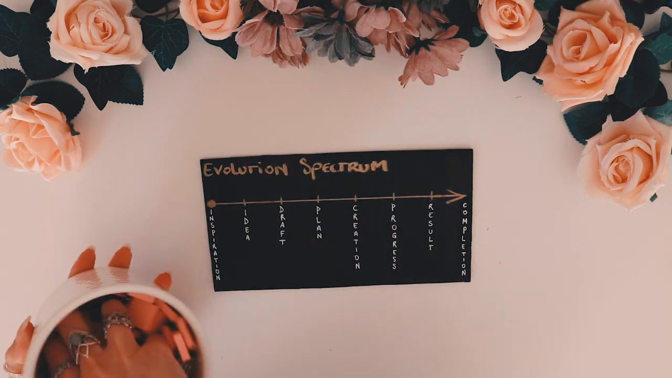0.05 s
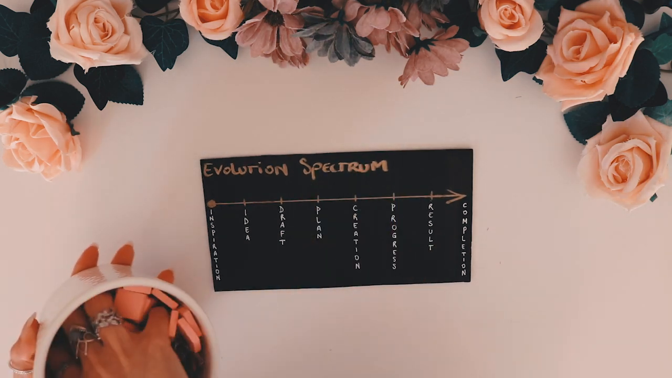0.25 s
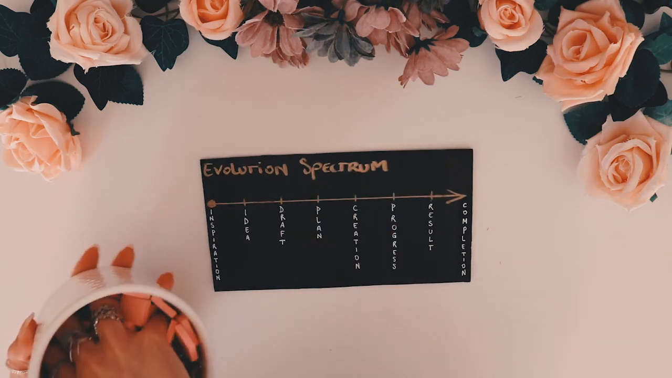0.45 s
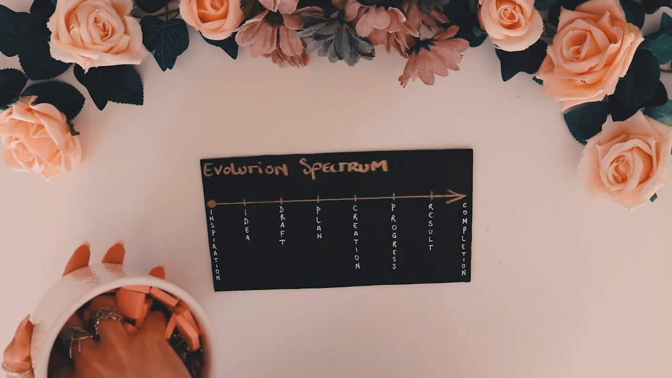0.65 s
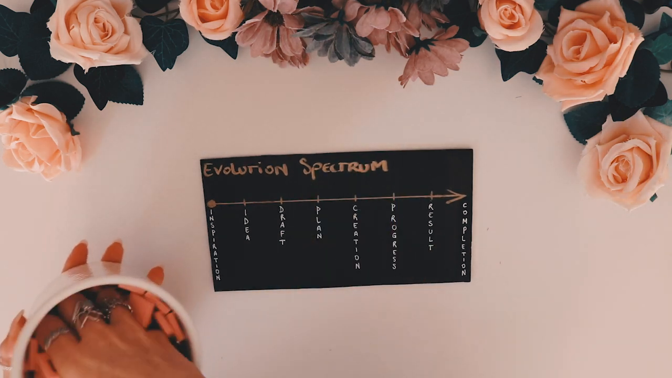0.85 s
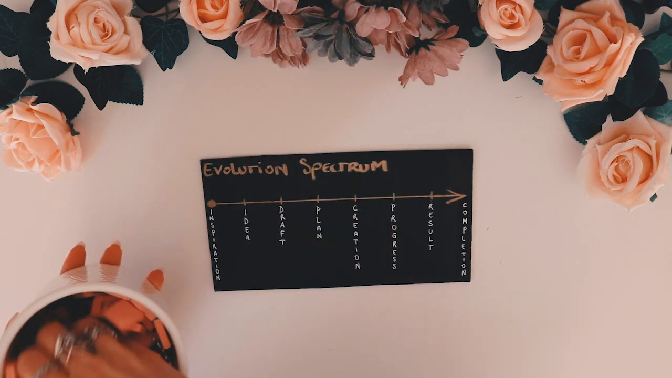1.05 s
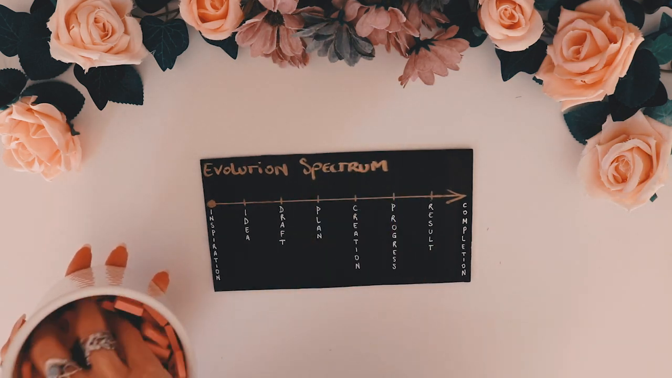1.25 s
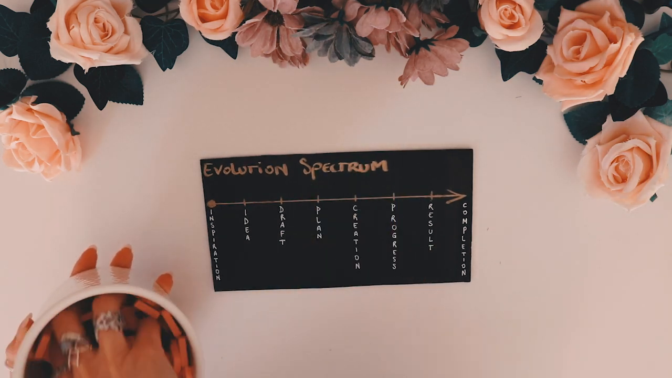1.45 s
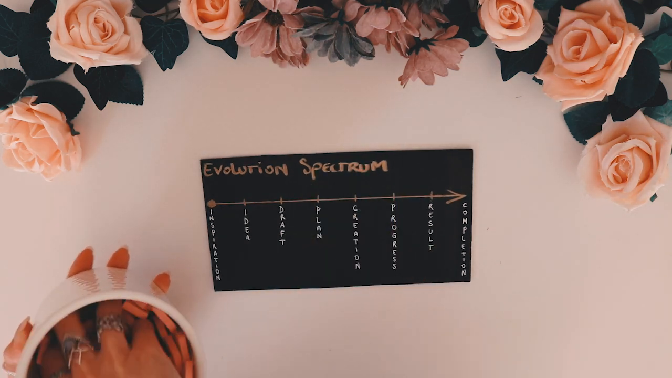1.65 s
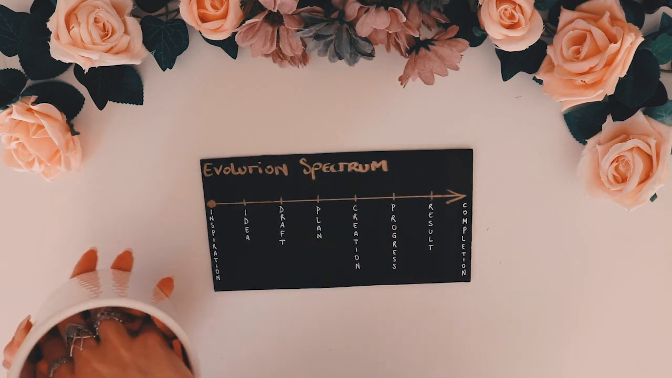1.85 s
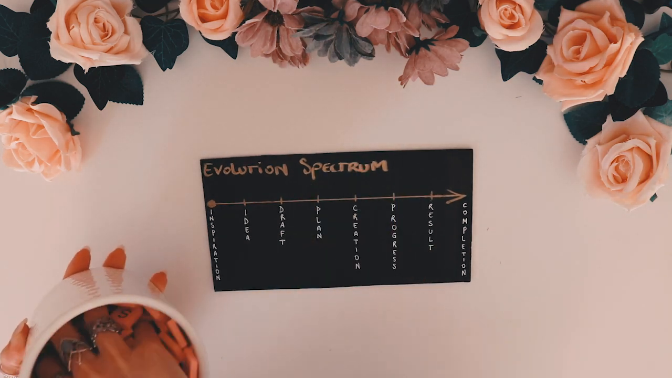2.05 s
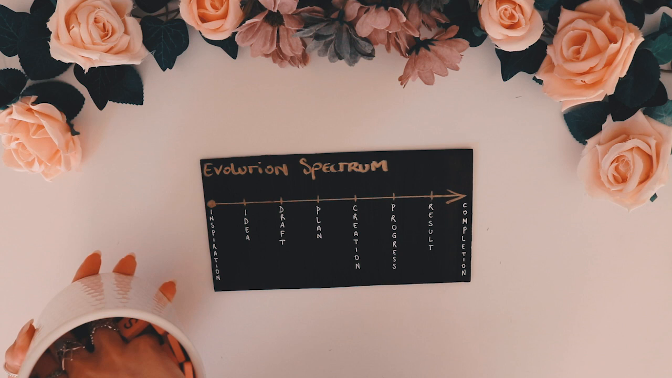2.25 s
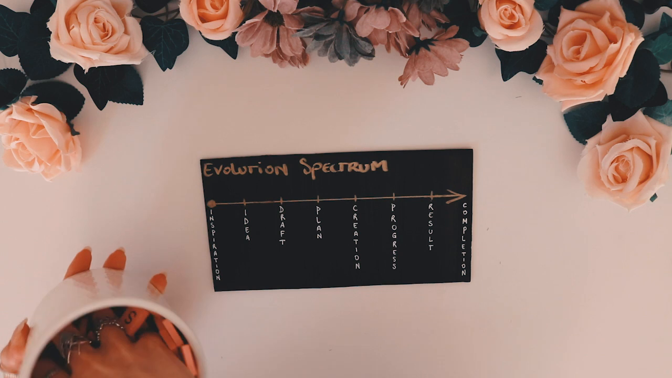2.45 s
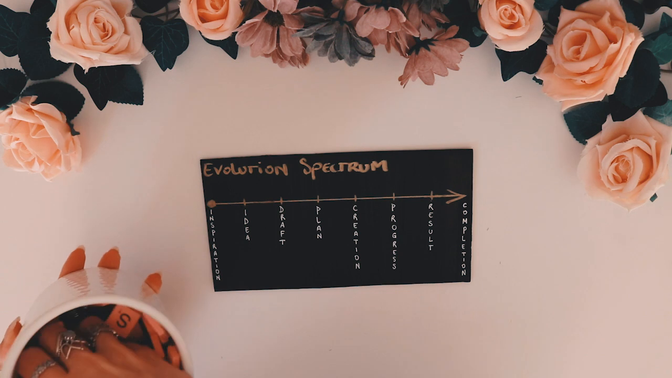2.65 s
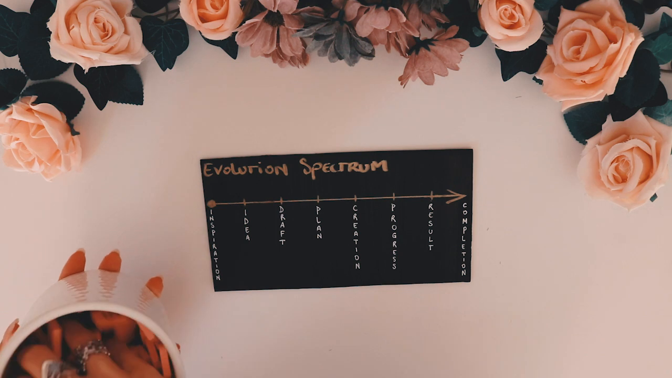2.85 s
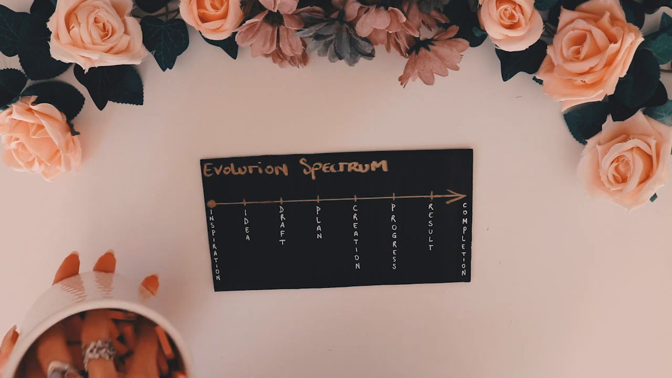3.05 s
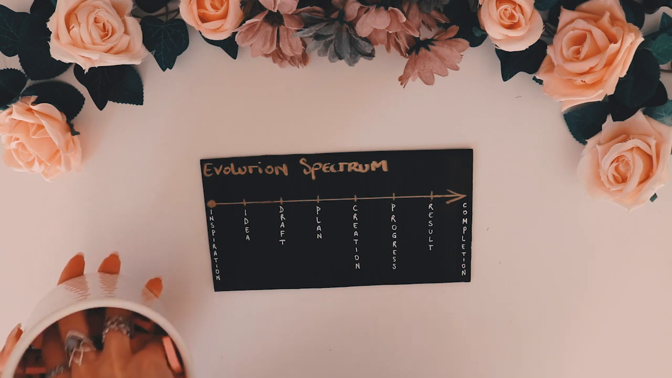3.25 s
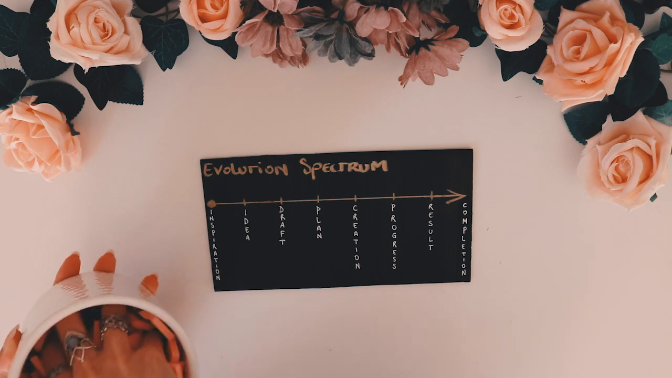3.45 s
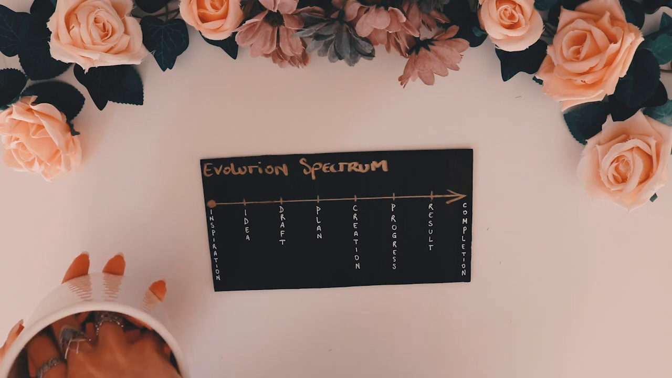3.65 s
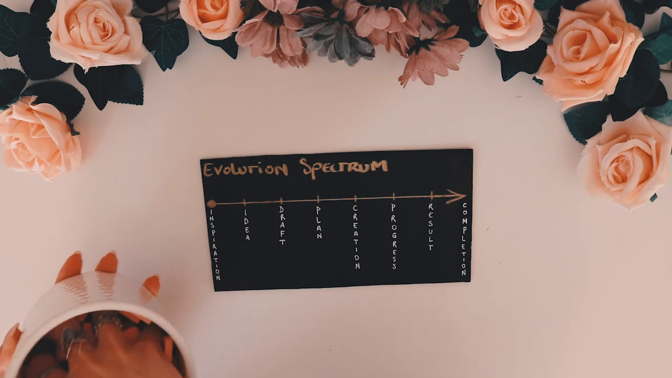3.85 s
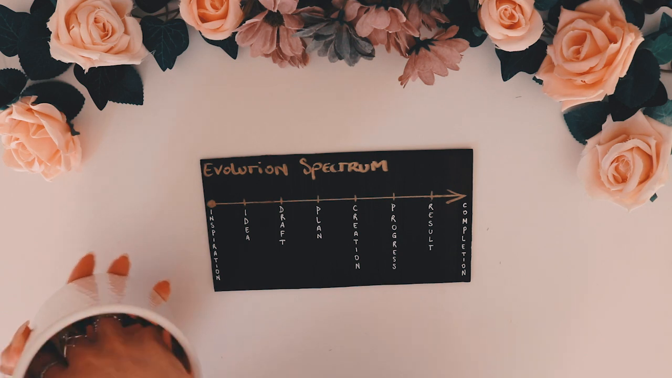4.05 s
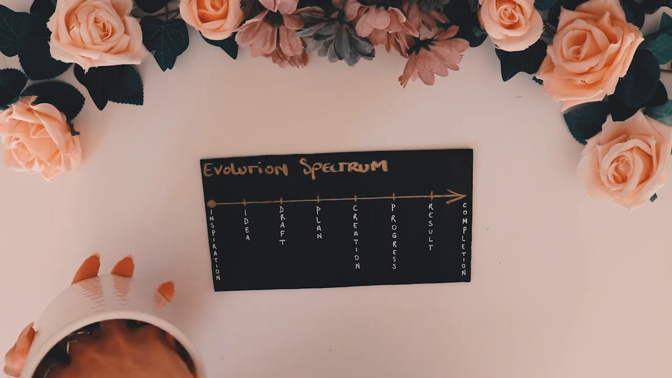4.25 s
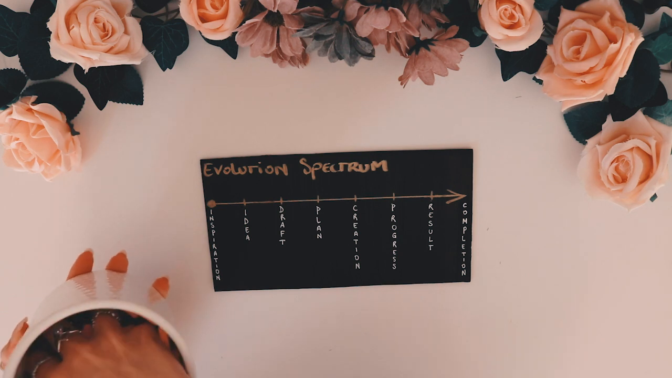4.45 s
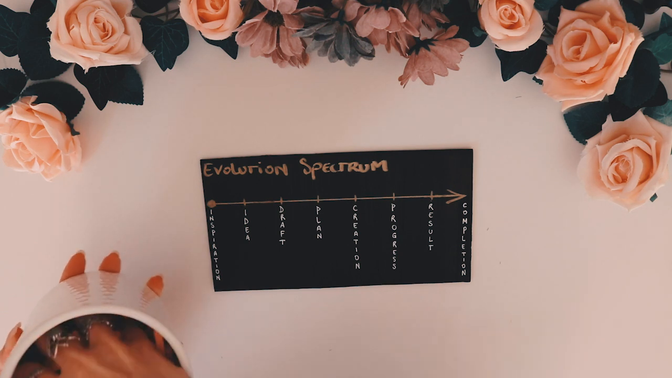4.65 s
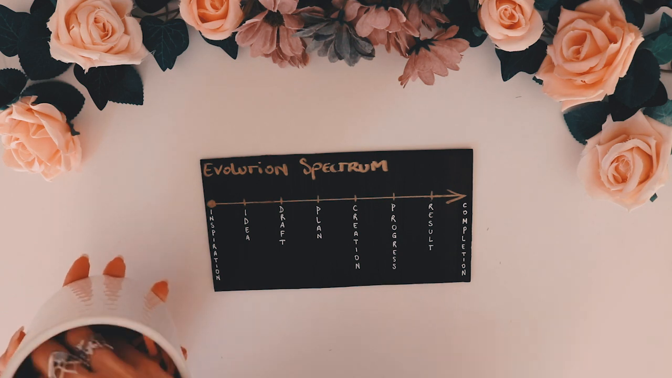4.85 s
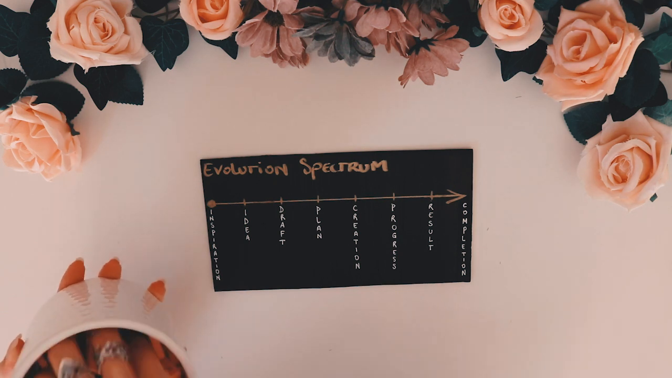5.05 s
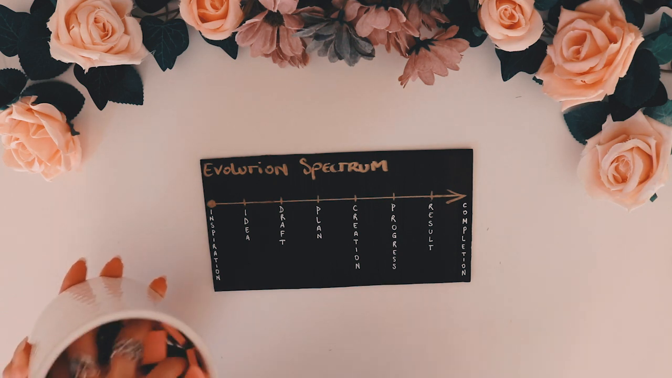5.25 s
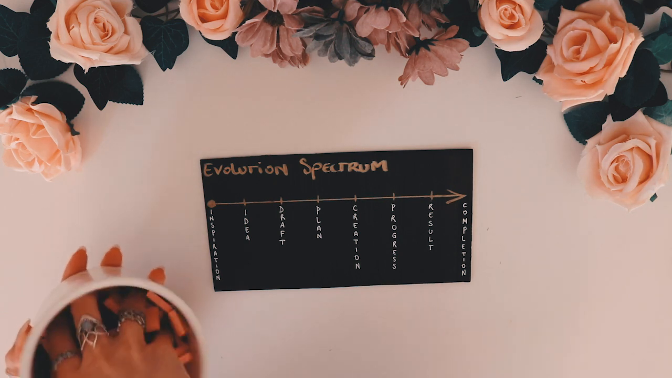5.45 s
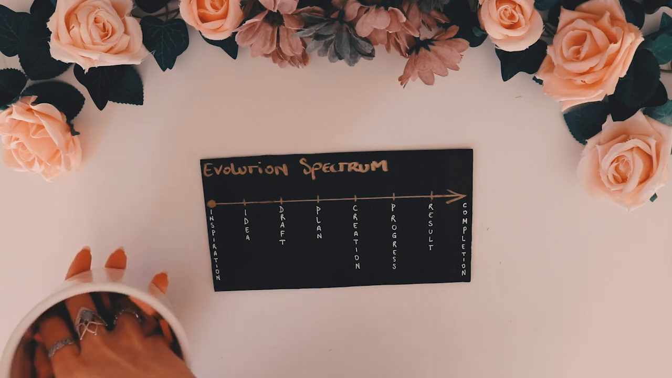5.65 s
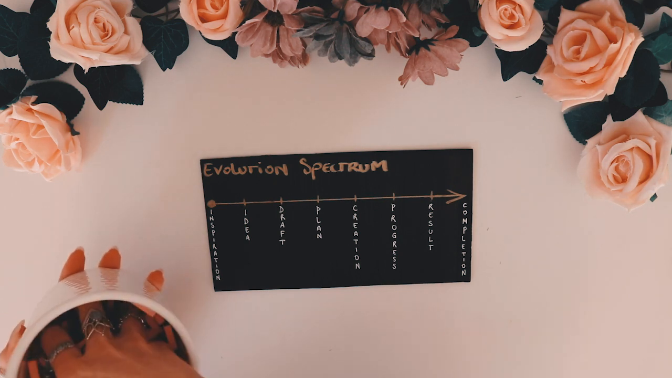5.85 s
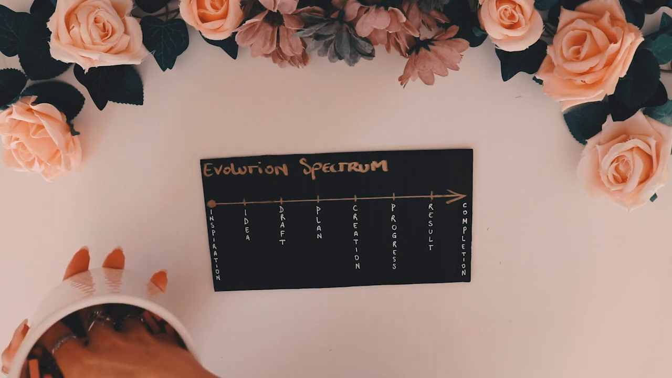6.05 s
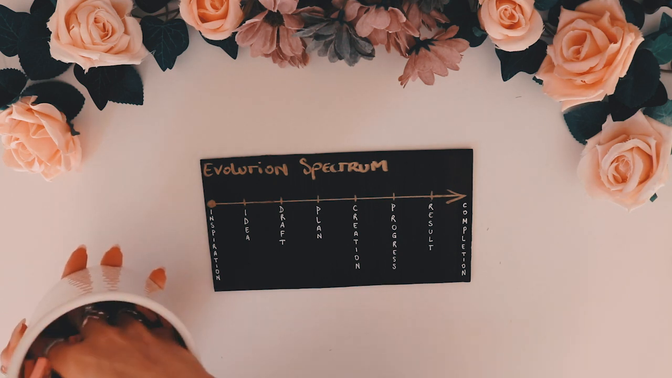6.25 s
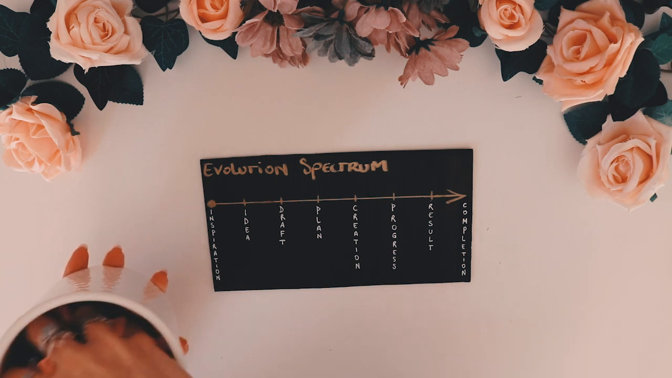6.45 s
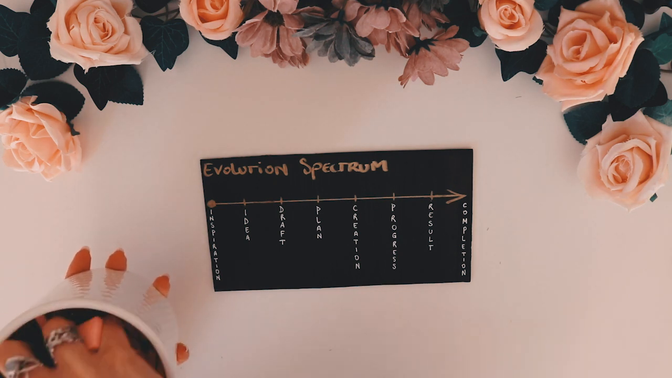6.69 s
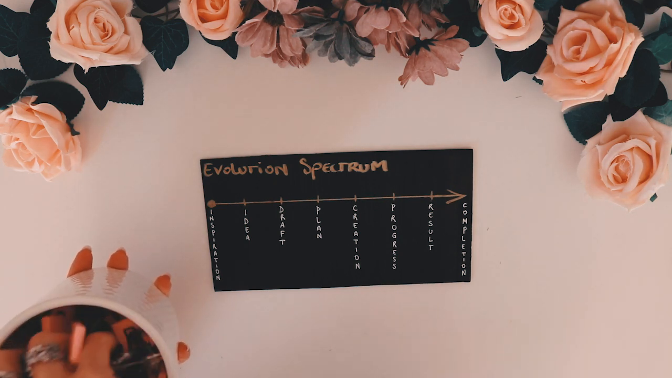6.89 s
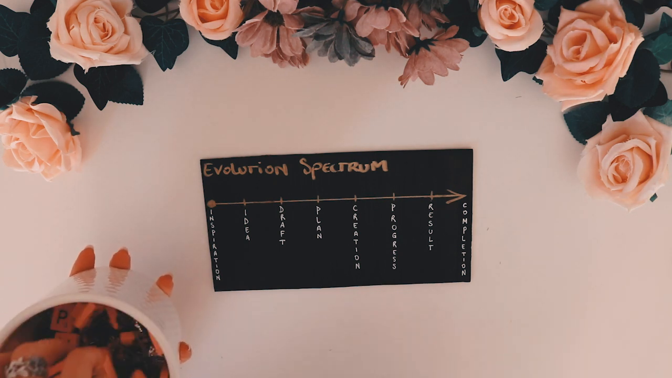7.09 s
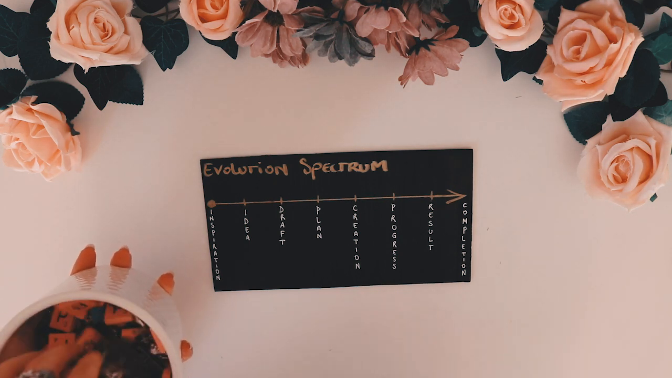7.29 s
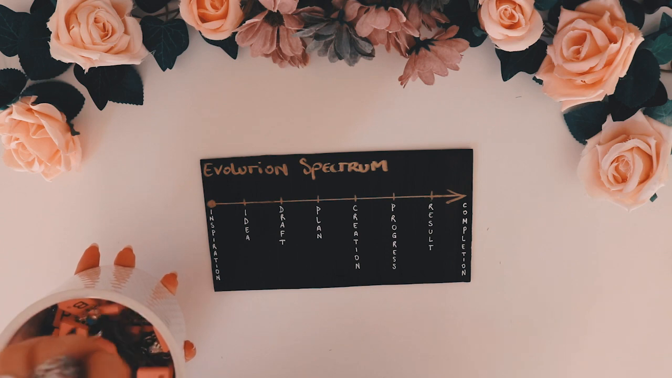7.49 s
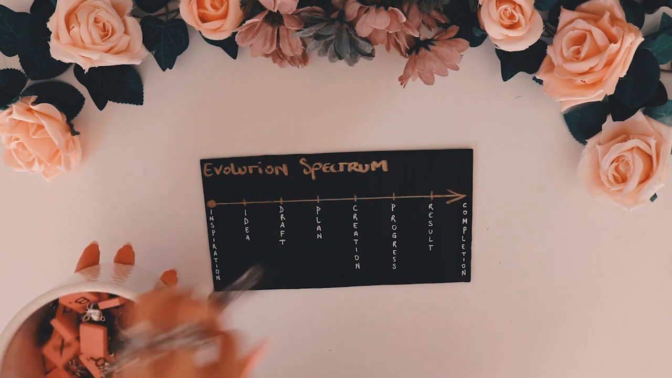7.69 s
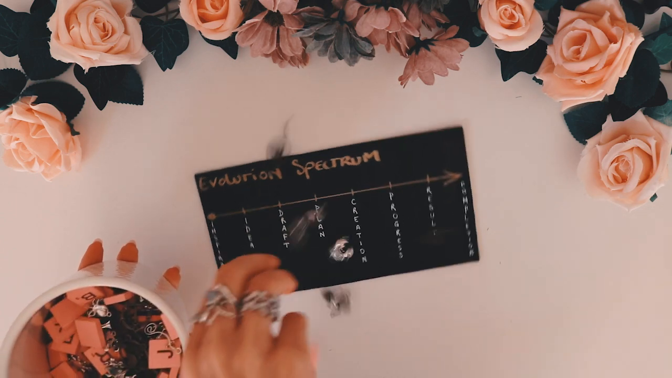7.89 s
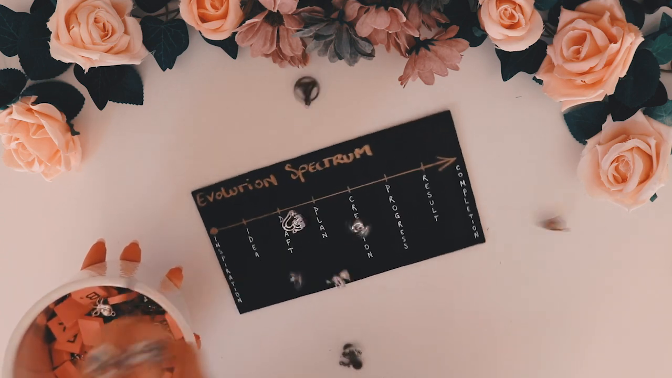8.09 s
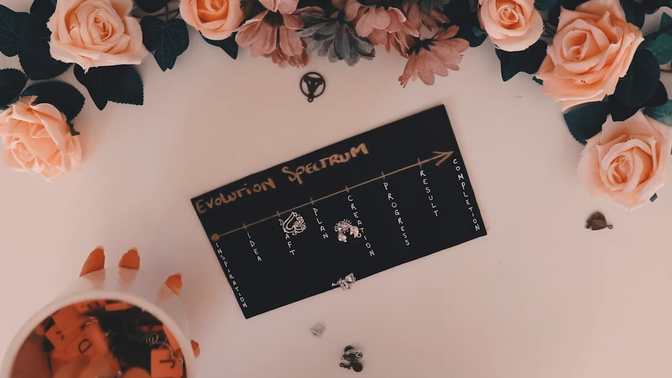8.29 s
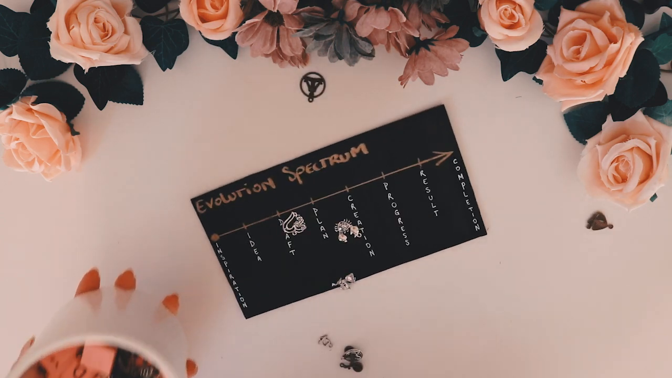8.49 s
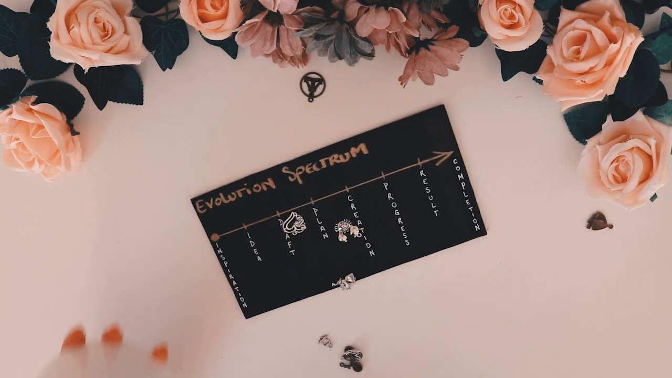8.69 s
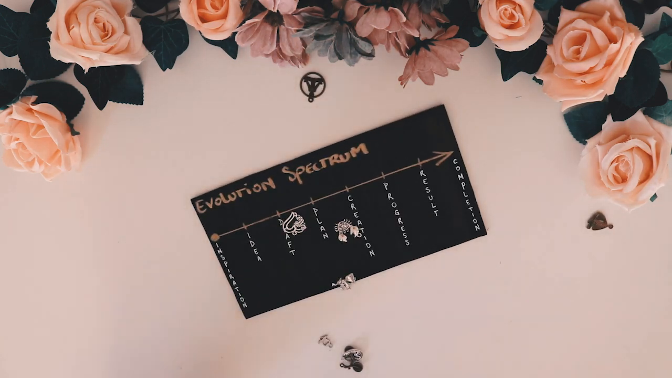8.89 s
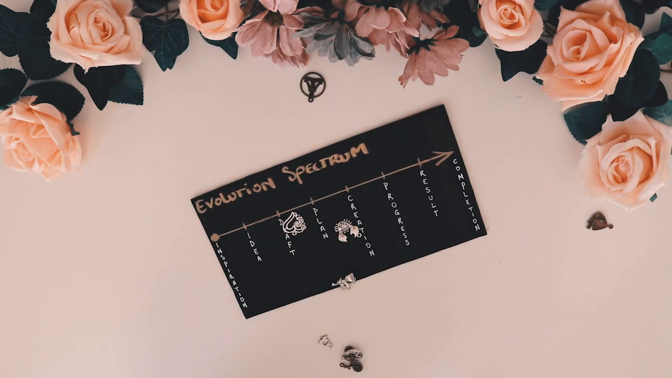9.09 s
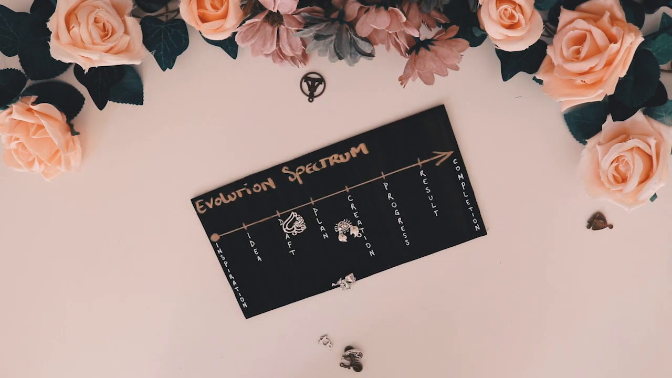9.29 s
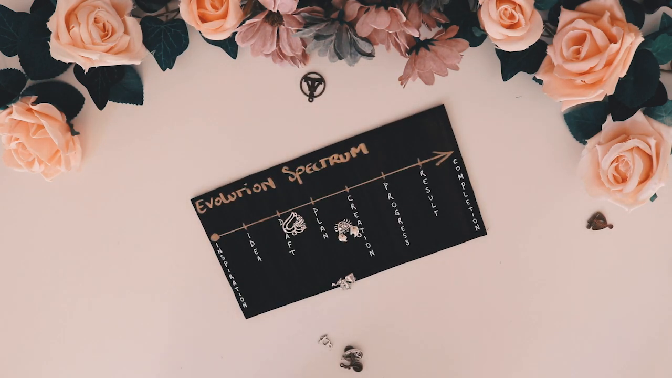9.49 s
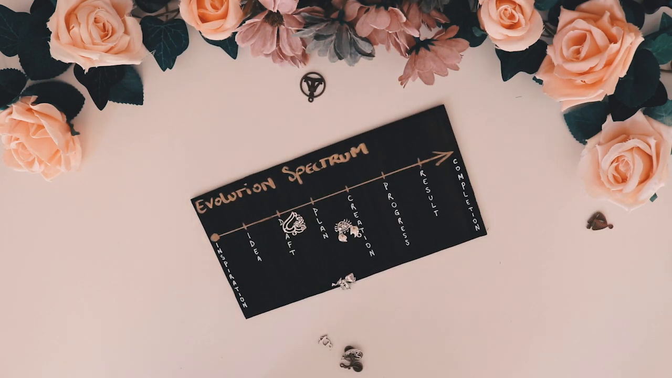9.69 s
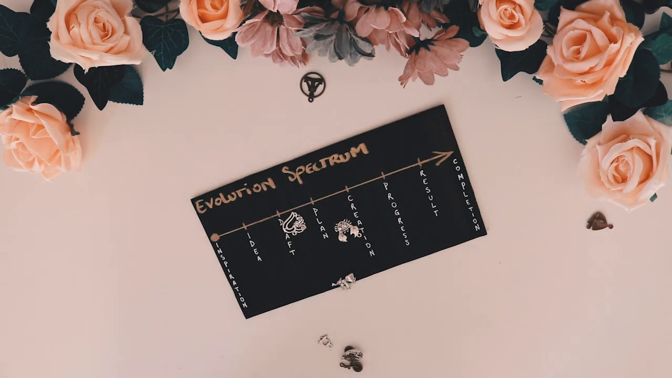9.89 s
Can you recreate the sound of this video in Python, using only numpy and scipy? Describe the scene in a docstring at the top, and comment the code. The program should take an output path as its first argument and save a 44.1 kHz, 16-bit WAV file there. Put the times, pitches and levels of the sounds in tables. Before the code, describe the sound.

A hand rummages through a ceramic cup of small metal charms and tiles, making a crisp, high, jingling rustle over a faint hollow cup tone. Some sharper knocks ring the wall. Then a brief dull-and-bright clatter as pieces land on card and tabletop and slide to a stop. A quiet pause, then several hard cup clinks. Close microphones, dry small room, very faint rumble.

```python
"""Small metal charms and tiles rustle and jingle in a ceramic cup, stirred by hand close to the microphone.
The crowd is filtered noise with tiny rings; the cup adds body resonances and a hollow that the hand tunes.
Snaps and knocks are noise cracks with ringing wall modes. A handful is cast on a card on the table,
clacking through plate modes and skittering to rest; then the cup clinks and its contents shift again.
Behind it lie a small room's reply, still air and a faint low rumble, in two microphone ports."""
import sys
import numpy as np
from scipy import signal
from scipy.fft import rfft, irfft, next_fast_len
from scipy.io import wavfile
from scipy.ndimage import uniform_filter1d, map_coordinates

SR = 44100
rng = np.random.default_rng(int(sys.argv[2]) if len(sys.argv) > 2 else 0)


def dump_mix(stems):
    """Bounce the given channels to the path in sys.argv[1] as a 16-bit WAV at rate SR."""
    frames = np.atleast_2d(stems).T  # one column per channel
    limited = np.clip(frames, -1, 1)  # hard clip at full scale
    pcm = np.round(limited * 32767).astype(np.int16)
    wavfile.write(sys.argv[1], SR, pcm)


N = 437913

TOP_HZ = 15900  # upper band limit
IDLE_S = 7.58  # until then the hand lies in the cup
HANDLING_S = 9.238  # the cup, set aside before, is moved again

# spectrum of a hard click, in the cup or on the table: (freq_hz, density_db per Hz)
CLICK_SPECTRUM = [(300, -40), (1200, -23.5), (3000, 0.5), (5000, 6.5), (9000, 5), (15500, -5.5)]


def stirring():
    """Charms tumble against each other and sound the cup's body and hollow."""
    # strokes of the fingers, then shifts of the charms in the moved cup after 9 s:
    # (start_s, length_s, relative level_db)
    strokes = [(-.03, .13, -40), (.14, 0.13, -42), (.28, 0.09, -40), (.467, .11, -38.5), (.62, 0.12, -41),
               (.76, 0.18, -46), (.905, 0.018, -46.5), (.97, 0.048, -42), (1.045, 0.11, -39.5),
               (1.15, 0.1, -39.5), (1.28, 0.15, -45.5), (1.4, 0.13, -43), (1.55, 0.026, -49.5),
               (1.645, 0.15, -41.5), (1.875, 0.063, -40), (2.06, 0.14, -43), (2.21, 0.081, -40.5),
               (2.37, 0.12, -46.5), (2.53, 0.1, -41.5), (2.65, 0.073, -45), (2.765, 0.11, -42),
               (2.91, 0.14, -43.5), (3.05, 0.021, -43), (3.2, 0.082, -38.5), (3.35, 0.069, -42),
               (3.51, 0.033, -40.5), (3.635, 0.028, -39.5), (3.745, 0.034, -42), (3.905, 0.047, -40.5),
               (4.035, 0.028, -45), (4.095, 0.049, -45), (4.22, 0.015, -46.5), (4.295, .012, -63),
               (4.35, 0.041, -41.5), (4.43, 0.14, -47.5), (4.54, 0.12, -44.5), (4.69, 0.25, -43),
               (4.97, 0.093, -41), (5.07, 0.16, -42.5), (5.31, 0.034, -43), (5.471, 0.11, -40),
               (5.65, 0.02, -41), (5.705, 0.076, -37.5), (5.86, 0.07, -46.5), (5.94, 0.067, -43),
               (6.01, 0.099, -41), (6.17, 0.18, -45.5), (6.35, 0.12, -48), (6.47, 0.1, -46.5),
               (6.55, 0.056, -46), (6.62, 0.1, -43), (6.74, 0.14, -40.5), (6.835, 0.083, -35),
               (6.93, 0.11, -39.5), (7.08, 0.04, -41.5), (7.108, 0.022, -41.5), (7.18, 0.063, -42),
               (7.315, 0.02, -43.5), (7.475, 0.069, -45), (7.38, 0.16, -43), (7.63, 0.02, -49),
               (7.71, 0.017, -57), (9.052, 0.025, -73), (9.16, 0.029, -98), (9.587, 0.032, -35),
               (9.69, 0.066, -38)]
    # broad resonances of the filled cup: (freq_hz, width_hz, relative level_db)
    body_modes = [(411, 34, -18.5), (1481, 24, 2), (1920, 82, -6), (2058, 110, -7.5), (2680, 140, -4),
                  (2960, 90, -7), (3407, 87, -4), (3680, 91, 1), (4445, 220, -3.5), (6730, 100, 3.5),
                  (7240, 150, -3.5), (9520, 120, 3.5), (10530, 56, 5), (11600, 49, -7.5), (11950, 70, -1),
                  (13100, 80, 3), (14690, 80, -5)]
    # spectrum of charm on charm: (freq_hz, density_db per Hz)
    rattle_spectrum = [(60, -21.5), (300, -34), (550, -32.5), (1100, -22), (1700, -11.5), (2300, -12),
                       (3100, -5.5), (4000, -3.5), (8000, 0.5), (10500, 3), (15500, -4.5)]
    settle_db_per_s = 190.5  # how fast the charms come to rest

    pushes = swells(strokes, attack_s=0.013, sag_db_per_s=16.5, release_db_per_s=settle_db_per_s)
    idle = amp(-50.5) * until(IDLE_S, settle_db_per_s)  # the resting hand keeps them faintly astir
    effort = np.hypot(pushes, idle)

    crowd = spread(contacts(rate=750, spread_db=3.6, click_t60=0.022, ring_t60=0.04, ring_db=-2.5, order=2))
    rattle = amp(-3) * effort * crowd
    ticks = contacts(rate=260, spread_db=5, click_t60=.003, ring_t60=.005, ring_db=-6)
    ticks = amp(-10) * effort * ticks

    wall_contacts = contacts(rate=700, spread_db=2.0, click_t60=0.035, ring_t60=0.03, ring_db=-10)
    on_wall = effort * spread(wall_contacts)
    body = np.zeros((2, N))
    for hz, width_hz, db in body_modes:
        # each resonance flares and fades as the charms touch other places; the high ones most
        flare_db = 3.36 * (hz / 7000) ** 0.34 * wander(rate=14)
        body += amp(db + flare_db) * signal.lfilter(*signal.iirpeak(hz, hz / width_hz, SR), on_wall)

    # the power below 1 lets gentle strokes still move the air in the cup
    push = amp(-46.0) * (effort / amp(-42.5)) ** 0.8 * crowd
    air = amp(9.5) * hollow(push, width_hz=118)

    jingle = amp(-3.5) * jingles(effort, rate=22, lo_hz=8000, hi_hz=15300, t60=.09)
    tiles = amp(1.5) * jingles(effort, rate=100, lo_hz=2500, hi_hz=7000, t60=.016)
    return coloured(rattle + ticks, rattle_spectrum) + amp(2.5) * body + air + jingle + tiles


def contacts(rate, spread_db, click_t60, ring_t60, ring_db, size=640, order=4):
    """Many tiny collisions a second: decaying noise clicks, some with a brief ring, evened out in level."""
    count = int(rate * N / SR)
    start, pitch, *angles = rng.random((count, 4)).T
    at = (start * N).astype(int)
    strength = amp(spread_db * rng.standard_normal(count))
    hits = np.bincount(at, strength ** 2, N)
    energy = signal.lfilter([1], [1, -fade(2 / SR, click_t60)], hits)
    crowd = np.sqrt(energy) * rng.standard_normal((2, N))

    t = np.arange(size) / SR
    free = np.s_[::order, None]  # only one charm in every `order` lies free enough to ring
    ring = amp(ring_db) * strength[free] * fade(t, ring_t60) * np.linspace(1, 0, size)
    places = (at[free] + np.arange(size)).ravel()
    for port, angle in zip(crowd, angles):
        tones = ring * np.sin(2 * np.pi * (TOP_HZ * pitch[free] * t + angle[free]))
        port += np.bincount(places, tones.ravel(), N + size)[:N]

    power = np.mean(crowd ** 2, axis=0)
    power = uniform_filter1d(uniform_filter1d(power, size=1200), size=1200)
    return crowd / np.sqrt(np.abs(power) + 1e-9)


def hollow(x, width_hz, dip_db=-2.5, open_db=-4):
    """The air in the cup: one resonance that sinks as the hand dips in and rises as it leaves."""
    # the hand dips deep and half closes the cup: (middle_s, half_length_s, pitch_fall_hz)
    dips = [(.98, 0.16, 95), (2.7, 0.19, 25), (4.75, 0.2, 78), (6.5, 0.26, 95)]
    inside_hz, open_hz = 723.5, 779  # with the hand inside and without
    hand_out_s, withdraw_s = 7.43, 0.46  # when and how slowly it leaves
    set_aside_db = -3  # the mouth of the cup then faces away

    t = np.arange(N) / SR
    fall = sum(fall_hz * np.exp(-((t - s) / half) ** 2) for s, half, fall_hz in dips)
    gone = .5 + .5 * np.tanh((t - hand_out_s) / withdraw_s)
    pitch = inside_hz + (open_hz - inside_hz) * gone - fall

    # shift the moving pitch down to zero, low-pass twice, and shift it back
    turn = np.exp(2j * np.pi * np.cumsum(pitch) / SR)
    band = signal.butter(1, width_hz / SR)
    slow = signal.lfilter(*band, signal.lfilter(*band, x.mean(axis=0) / turn))
    air = 2 * np.real(turn * slow)

    db = dip_db * fall / fall.max() + open_db * gone + set_aside_db * (t > HANDLING_S)
    return amp(db) * signal.lfilter(*signal.butter(2, [520, 1000], "band", fs=SR), air)


def jingles(effort, rate, lo_hz, hi_hz, t60):
    """Now and then a loosened charm or tile gives a small ring, stronger in a brisk stroke."""
    out, t = np.zeros((2, N)), np.arange(SR // 4) / SR
    for when, pitch, size, lag in rng.random((int(rate * N / SR), 4)):
        hz = lo_hz + pitch * (hi_hz - lo_hz)
        phase = 2 * np.pi * (hz * t + lag * np.array([[0], [.5]]))
        add(out, when * N / SR, size * effort[int(when * N)] * np.sin(phase) * fade(t, t60))
    return out


def knocks():
    """A charm cracks and clacks on a neighbour or the wall, whose beating modes ring as the grip allows."""
    # strikes on the wall: (start_s, relative level_db, ring_db re level, favoured_hz, lift_db, length_factor)
    wall_knocks = [(3.245, -31, -7, 3680, 7.5, 0.58), (3.345, -38, -7.5, 3692, 9, .8),
                   (4.053, -44.5, -9, 6700, 14, .4), (4.553, -39.5, -7.5, 6900, 8, 0.34),
                   (5.104, -31, -8.5, 6600, 3.5, 0.79), (5.3095, -18, -13, 10450, 4, 0.34),
                   (5.333, -33.5, -8.5, 3670, 9.5, 1), (5.73, -37, -10, 6800, 8.5, .91),
                   (6.85, -28.5, -5, 6680, 11.5, 0.71), (6.857, -27, -4.5, 3690, 1, .7),
                   (6.881, -27, -12, 6780, 7, 0.3), (6.942, -32.5, -4, 6720, 9.5, 1),
                   (6.98, -32, -8, 6700, 6.5, .51), (7.034, -31, -7.5, 3730, 8.5, 0.54),
                   (7.072, -22, -7.5, 1472, 9, 1), (7.074, -28.5, -10, 3692, 12, 0.89),
                   (7.646, -27, -15, 3710, 5, 0.59), (7.721, -23.5, -13, 3800, 5.5, 0.53),
                   (8.24, -31.5, 0.5, 6590, 3.5, .39), (8.421, -31, -4.5, 6640, 4.5, .4),
                   (9.376, -28.5, -5, 3870, 8, 0.27), (9.381, -30.5, -3.5, 3710, 13, 0.35),
                   (9.524, -37, 7, 6400, 9, 0.4), (9.529, -37, 9.5, 1526, 9.5, 0.22),
                   (9.593, -22.5, -13.5, 5850, 6.5, 0.22), (9.595, -16.5, -12, 4590, 13, 0.16),
                   (9.604, -29.5, -11, 3710, 12, 0.49), (9.617, -29, -12, 9400, 2, .35),
                   (9.669, -33.5, -16, 9520, 1, .3), (9.69, -27, -3.5, 6500, 8, 0.63),
                   (9.703, -27, -5, 10600, 4, 0.27), (9.7217, -19.5, -9.5, 4750, 3, 0.29),
                   (9.728, -31.5, -6, 3700, 12.5, 0.71), (9.742, -25, -13.5, 11950, 15, .4),
                   (9.756, -26, -9, 6700, 6, .31), (9.765, -29.5, -4, 6700, 4, 0.17)]
    # charm snapping against charm: (start_s, relative level_db, note_hz)
    charm_snaps = [(0.0922, -35, 6730), (0.1485, -16, 9860), (0.3493, -26.5, 6800), (0.47, -40, 10700),
                   (0.495, -33, 6260), (0.5282, -25, 12500), (0.6624, -32.5, 10450), (0.7018, -30, 10400),
                   (0.8067, -32, 3630), (0.912, -32, 4480), (0.97, -31, 10360), (1.04, -30.5, 5630),
                   (1.126, -25.5, 2770), (1.141, -28, 5440), (1.188, -32, 6720), (1.2785, -28, 6720),
                   (1.4, -26, 6640), (1.4279, -24, 6800), (1.4773, -27, 6730), (1.6504, -33, 10300),
                   (1.8522, -29.5, 6500), (2.3725, -30, 8800), (2.393, -32, 9000), (2.6636, -25, 10450),
                   (2.9083, -24.5, 9050), (3.055, -31.5, 5760), (3.0867, -21, 8700), (3.2244, -27, 6630),
                   (3.542, -33, 6660), (3.5926, -29.5, 9910), (3.6471, -27, 6600), (3.9335, -27.5, 6630),
                   (4.1744, -30.5, 6890), (4.2255, -26, 10000), (4.5854, -30.5, 9700), (4.8267, -33, 7500),
                   (5.4725, -34, 6700), (5.5558, -24.5, 6700), (5.7044, -32.5, 7890), (6.356, -24, 8360),
                   (6.411, -29, 9100), (6.4884, -27, 10500), (6.569, -28.5, 11300), (6.767, -29.5, 6700),
                   (6.8019, -26, 6670), (7.245, -25, 7500), (7.2715, -30.5, 8960), (7.345, -28, 8900),
                   (7.363, -29, 7800), (7.401, -25, 8300), (7.66, -35, 6850), (9.0542, -51.5, 6400),
                   (9.0678, -65, 6390), (9.0937, -64.5, 9200), (9.2446, -42.5, 10300), (9.257, -51, 7000)]
    # modes of the ceramic wall: (freq_hz, relative level_db, t60_s at length factor 1)
    wall_modes = [(1480, -9.5, 0.31), (3702, -3.5, 0.21), (4030, -13.5, .05), (4660, -13.5, 0.05),
                  (5700, -14.5, 0.037), (6702, -0.5, 0.22), (6900, -9, 0.15), (9550, 0.5, 0.21),
                  (10280, 2.5, 0.26), (11100, -12, .15), (12200, -4, 0.22), (13190, -8, .2),
                  (14700, -6.5, 0.22)]
    # what the table carries once the cup is set down: (freq_hz, density_db per Hz)
    table_spectrum = [(100, -25), (350, -24), (600, -0.5), (1100, 2), (1700, -3), (3000, -25), (8000, -50)]
    set_down_s = 9.58

    cracks, rings = np.zeros((2, 2, N))
    t = np.arange(SR // 4) / SR
    hz, level_db, t60 = np.transpose(wall_modes)[..., None]
    # a snap barely stirs the wall: ring -19.5 dB, nearest mode lifted 3 dB, ring length factor 0.59
    snaps = [(s, db, -19.5, note_hz, 3, 0.59) for s, db, note_hz in charm_snaps]
    for s, db, ring_db, favoured_hz, lift_db, length in wall_knocks + snaps:
        crack = rng.standard_normal((2, len(t))) * (fade(t, 0.08) + amp(-36.5) * fade(t, .1))
        add(cracks, s, amp(db - 15.5) * crack)

        # the striking charm's own short note; charms are too small to sound low ones
        small = min(favoured_hz / 4700, 1) ** 2
        clack = np.sin(2 * np.pi * favoured_hz * t) * fade(t, 0.046)
        add(rings, s, small * amp(db - 11) * clack)

        # the place struck favours one mode
        favour_db = lift_db * np.exp(-(np.log(hz / favoured_hz) / 0.049) ** 2)
        # a soft touch misses the high modes
        soft_db = max(ring_db, 0) * (hz / 7000) ** 3
        # a glancing blow hardly moves the lowest mode
        glance_db = min(ring_db + 7, 0) * (1800 / hz) ** 2
        strength = amp(level_db + favour_db - soft_db + glance_db + rng.normal(0, 1.7, hz.shape))

        pitch = hz * (1 + rng.normal(0, .003, hz.shape))
        # touching charms blur the ring at first
        chatter = np.cumsum(rng.normal(0, 0.0079, (len(hz), len(t))) * fade(t, 0.14), axis=1)
        port_phase = rng.normal(0, 1.0, (2, len(hz), 1)) / 2
        phase = 2 * np.pi * (pitch * t + rng.random(hz.shape)) + chatter + port_phase
        # paired modes beat at 20-70 Hz
        beat = 1 + .3 * np.cos(2 * np.pi * rng.uniform(20, 70, hz.shape) * t)
        modes = strength * beat * np.sin(phase) * fade(t, t60 * max(length, .1))
        add(rings, s, amp(db + ring_db - 4.5) * np.sum(modes, axis=1))

    on_table = spread(cracks) * (np.arange(N) / SR > set_down_s)
    set_down = amp(-13) * coloured(on_table, table_spectrum)
    air = amp(4.0) * hollow(cracks, width_hz=240)
    return coloured(spread(cracks), CLICK_SPECTRUM) + rings + set_down + air


def pings():
    """Small rings at single pitches, mostly high: each a decaying sine, slightly out of phase in the ports."""
    # small rings at single pitches: (start_s, pitch_hz, relative level_db, t60_s)
    small_rings = [(.54, 12550, -33, .16), (2.48, 11950, -38, 0.15), (2.905, 9070, -41, .15),
                   (5.132, 12550, -32.5, 0.25), (5.68, 12600, -43, .2), (5.5, 14380, -42, .22),
                   (6.18, 12600, -39, 0.32), (0.002, 14200, -37, .15), (.655, 10200, -44, .15),
                   (1.125, 10600, -42, .15), (2.935, 10440, -40, 0.19), (3.245, 10360, -39, .15),
                   (5.975, 9500, -40, .15), (6.525, 9560, -36, .15), (6.569, 14640, -36, .15),
                   (6.569, 11200, -32.5, .16), (6.975, 11200, -39, .15), (7.072, 9800, -33, 0.14),
                   (7.072, 12300, -31, .12), (7.072, 7300, -39, 0.14), (7.485, 12300, -36, .15),
                   (7.516, 10400, -37.5, 0.16), (7.721, 8720, -44.5, 0.34), (7.868, 10430, -44, .25),
                   (8.023, 11330, -38.5, .25), (9.381, 3920, -53, 0.14), (9.618, 14730, -40, .15),
                   (7.274, 8940, -36, 0.16), (7.395, 14950, -38, .2), (7.415, 8990, -27.5, 0.16),
                   (7.721, 9860, -29, 0.38), (7.72, 12950, -42.5, 0.32), (7.868, 13000, -40.5, 0.23),
                   (7.868, 14500, -39.5, 0.2), (8.24, 14040, -31, 0.14), (8.12, 11440, -34, 0.11),
                   (8.125, 15400, -31.5, 0.31)]
    out, t = np.zeros((2, N)), np.arange(SR // 2) / SR
    for s, hz, db, t60 in small_rings:
        tone = np.sin(2 * np.pi * hz * t + rng.normal(0, 0.21, (2, 1)))
        add(out, s, amp(db - 1.5) * tone * fade(t, t60))
    return out


def cast():
    """Each landing clicks, clacks on the card and thumps the table top; then the charms slide to rest."""
    # charms landing on card and table: (start_s, relative thump_db, clack_db, click_db)
    landings = [(7.828, -32.5, -24, -36.5), (7.853, -40, -27.5, -29), (7.867, -21.5, -25, -46),
                (7.874, -33.5, -31.5, -48), (7.89, -35.5, -27.5, -38), (7.909, -36, -44.5, -53),
                (7.967, -45.5, -33, -37), (7.978, -48.5, -34, -39), (7.989, -41, -23, -37),
                (8.002, -37, -37, -47), (8.015, -42, -38, -31), (8.021, -46.5, -25.5, -29.5),
                (8.027, -40.5, -32.5, -36.5), (8.035, -38, -33, -44.5), (8.061, -48, -43, -28.5),
                (8.094, -53, -34.5, -41), (8.121, -40, -31.5, -37), (8.142, -31.5, -34, -37.5),
                (8.156, -55, -32, -28), (8.219, -41, -35, -41), (8.229, -38, -34, -28.5),
                (8.237, -48, -37, -30.5), (8.278, -48, -38.5, -33.5), (8.295, -58, -40, -32),
                (8.308, -55, -39, -33.5), (8.349, -48, -39, -32.5)]
    # soft bumps of the hand on the table: (start_s, relative level_db)
    bumps = [(8.845, -70)]
    # charms skittering over the table: (start_s, length_s, relative level_db)
    slides = [(7.965, 0.06, -33.5), (8.03, 0.42, -37)]
    # modes of the table top: (freq_hz, relative level_db, t60_s)
    table_modes = [(80.6, -11.5, 0.1), (180, -17, 0.1), (247.3, -3.5, 0.052), (291, -6, 0.072),
                   (377, -4, 0.055), (423, -7, 0.06)]
    # modes of the card: (freq_hz, relative level_db, t60_s)
    card_modes = [(698, -5.5, 0.087), (842, -2.5, 0.07), (1087, 1, 0.059), (1188, -6.5, 0.079),
                  (1444, -7, 0.056), (2070, -11, 0.069)]
    # spectrum of charm sliding on table: (freq_hz, density_db per Hz)
    slide_spectrum = [(29, -57.5), (50, -16), (298, -6), (572, -6.5), (842, -6), (1470, 0), (6390, -5.5),
                      (6870, -16), (7760, -11), (10100, -5), (13500, -13.5), (14900, -11), (16000, -23.5)]
    # spectrum of a landing's dull thud: (freq_hz, density_db per Hz)
    thud_spectrum = [(25, -23), (60, -7), (135, -8), (250, -1), (450, -4), (560, -11.5), (800, -1.5),
                     (1150, -2), (1600, -7), (3000, -15.5), (6000, -37)]

    clicks, thuds, rings = np.zeros((3, 2, N))
    t = np.arange(SR // 4) / SR
    touch = amp(4.5) * (1 - fade(t, 0.0093))  # an edge touches first, then the whole charm
    for s, thump_db, clack_db, click_db in landings:
        add(clicks, s, amp(click_db) * rng.standard_normal((2, len(t))) * touch * fade(t, 0.028))
        add(thuds, s, amp(clack_db - 4) * noise(len(t), width=0.43) * touch * fade(t, 0.028))
        add(rings, s, amp(thump_db - 1) * struck(table_modes, t) + amp(clack_db - 6.5) * struck(card_modes, t))
    for s, db in bumps:
        soft = signal.lfilter(*signal.butter(1, 600, fs=SR), noise(len(t), width=0.23))
        add(thuds, s, amp(db + 3) * soft * fade(t, .16))
    rings = signal.lfilter(*signal.butter(2, 75, "high", fs=SR), rings)

    speed = swells(slides, attack_s=0.029, sag_db_per_s=18, release_db_per_s=162)
    slide = speed * contacts(rate=480, spread_db=1.8, click_t60=0.016, ring_t60=0.038, ring_db=-0.5)
    dull = signal.lfilter(*signal.butter(1, 5000, fs=SR), slide)
    slide = dull + np.minimum(speed / amp(-57.5), 1) * (slide - dull)  # slow charms lose their treble
    scrape = spread(coloured(slide, slide_spectrum))

    # the scrape also sets table and card ringing
    scrape_ring = np.zeros(N)
    for hz, db, t60 in table_modes + card_modes:
        peak = signal.iirpeak(hz, hz * t60 / 2.2, SR)
        scrape_ring += amp(db) * signal.lfilter(*peak, scrape.mean(axis=0))
    impacts = spread(coloured(clicks, CLICK_SPECTRUM)) + coloured(thuds, thud_spectrum) + rings
    return impacts + amp(0.5) * scrape + scrape_ring


def struck(modes, t):
    """A plate rings from rest; each blow finds the modes a little differently."""
    hz, db, t60 = np.transpose(modes)[..., None]
    phase = 2 * np.pi * hz * t + rng.normal(0, .25, (2, len(hz), 1))
    strength = amp(db + rng.normal(0, 1.5, hz.shape))
    return np.sum(strength * np.sin(phase) * fade(t, t60), axis=1) * (1 - fade(t, 0.0054))


def jolts():
    """The hand passes a soft, dull bump on to the cup: a decaying burst of low noise."""
    # the hand jolts the cup: (start_s, relative level_db)
    hand_jolts = [(0.147, -52), (5.3076, -33.5), (6.85, -42), (7.072, -34), (9.246, -58), (9.757, -55)]
    bumps, t = np.zeros((2, N)), np.arange(SR // 3) / SR
    for s, db in hand_jolts:
        add(bumps, s, amp(db - 18) * noise(len(t), width=0.32) * fade(t, 0.04))
    return coloured(bumps, [(30, 5.0), (80, -2.0), (300, -6.0), (900, -25.0), (3000, -54)])


def room(x):
    """The walls answer with a decaying noise tail; long waves reach both ports alike."""
    # reverberation time of the small room, treble dying soonest: (freq_hz, t60_s)
    decay_times = [(100, 0.13), (1000, 0.29), (5000, 0.37), (10000, 0.25), (16000, 0.031)]
    hz, t, z = signal.stft(rng.standard_normal((2, SR // 2)), SR, nperseg=256)
    apart = np.minimum(hz / 3500, 1)[:, None] * np.pi / 2
    z[1] = np.cos(apart) * z[0] + np.sin(apart) * z[1]
    tail = signal.istft(z * fade(t, along(decay_times, hz)[:, None]), SR, nperseg=256)[1]
    tail = tail * (1 - fade(np.arange(tail.shape[1]) / SR, 0.094))  # the reply builds up gradually
    return signal.fftconvolve(x, tail / np.linalg.norm(tail[0]), axes=1)[:, :N]


def background():
    """Still air and a faint low rumble, stronger once the cup is moved again, both of coloured noise."""
    # spectrum of the quiet room: (freq_hz, density_db per Hz)
    air_spectrum = [(12, -26.5), (20, 2), (182, -5.5), (377, -14.5), (624, -9), (1660, -23), (8650, -21.5),
                    (16000, -38.5)]
    # spectrum of the low rumble: (freq_hz, density_db per Hz)
    rumble_spectrum = [(12, -30.5), (20, -3), (199, -19), (497, -26), (693, -26.5), (1210, -31),
                       (1590, -33.5), (13800, -32.5), (15000, -40)]
    air = amp(-84.5) * coloured(noise(N, width=1.0), air_spectrum)
    # a faint low rumble that stays nearly steady throughout
    faint = amp(-86.5) * until(IDLE_S, release_db_per_s=0.5)
    moving = amp(-59.5) * (1 - until(HANDLING_S, release_db_per_s=1205.0))
    return air + (faint + moving) * coloured(noise(N, width=1.1), rumble_spectrum)


def spread(x):
    """The two ports agree most from about 2 to 6 kHz, less in the bass and upper treble."""
    # how alike left and right are: (freq_hz, likeness 0 to 1)
    likeness = [(100, 0.21), (700, 0.55), (2500, 1), (3500, 0.96), (6000, 0.89), (8200, 0.52),
                (14000, 0.16)]

    def turn(hz):
        """Angle in radians that mixes mid and side to the likeness."""
        return np.arccos(np.clip(along(likeness, hz), -1, 1)) / 2

    mid, side = filtered(x, lambda hz: np.array([np.cos(turn(hz)), np.sin(turn(hz))]))
    return np.array([mid + side, mid - side])


def swells(rows, attack_s, sag_db_per_s, release_db_per_s):
    """Gain of a series of pushes: each rises, sags while it lasts and dies away; their powers add."""
    power, t = np.zeros((1, N)), np.arange(SR) / SR
    for s, length, db in rows:
        level_db = db - sag_db_per_s * t - release_db_per_s * np.maximum(t - length, 0)
        gain = np.minimum(t / attack_s, 1) * amp(level_db)
        add(power, s, gain[max(round(-s * SR), 0):] ** 2)  # a push begun before time 0 loses its start
    return np.sqrt(power[0])


def until(s, release_db_per_s):
    """Gain 1 up to time s, then dying away."""
    return amp(-release_db_per_s * np.maximum(np.arange(N) / SR - s, 0))


def wander(rate):
    """A smooth random curve, rate knots a second."""
    knots = rng.standard_normal(int(N * rate / SR) + 4)
    return map_coordinates(knots, [np.arange(N) * rate / SR], order=2)


def noise(size, width):
    """Stereo white noise; width is side over mid."""
    mid, side = rng.standard_normal((2, size))
    return np.array([mid + width * side, mid - width * side]) / np.hypot(1, width)


def amp(db):
    """Decibels to gain."""
    return 10 ** (np.asarray(db) / 20)


def fade(t, t60):
    """Free decay by 60 dB in t60 seconds."""
    return np.exp(-np.log(1000) * t / t60)


def add(track, s, sound):
    """Mix a sound in at time s."""
    part = track[:, max(round(s * SR), 0):][:, :sound.shape[-1]]
    part += sound[..., :part.shape[1]]


def along(points, hz):
    """Read (freq_hz, value) points on a log frequency axis."""
    f, v = np.transpose(points)
    return np.interp(np.log(hz + 1), np.log(f + 1), v)


def filtered(x, response):
    """Apply a complex response of frequency to x."""
    size = next_fast_len(N + SR // 2, True)
    return irfft(rfft(x, size) * response(np.fft.rfftfreq(size, 1 / SR)), size)[..., :N]


def coloured(x, spectrum, size=4096):
    """Causal (minimum-phase) filter with the given spectrum and energy 1."""
    gain = amp(along(spectrum, np.fft.rfftfreq(size, 1 / SR)))
    cepstrum = irfft(np.log(gain + 1e-6))
    cepstrum[1:size // 2] *= 2
    cepstrum[size // 2 + 1:] = 0
    kernel = irfft(np.exp(rfft(cepstrum)))
    return signal.oaconvolve(x, kernel[None] / np.linalg.norm(kernel), axes=1)[:, :N]


def scene():
    """The cup sits nearer the right microphone port, the card almost straight ahead."""
    # level of the cup between the ports: (freq_hz, left_minus_right_db)
    balance = [(100, -2.5), (700, -5), (1450, -2.5), (2500, -0.5), (3700, -4), (5000, -0.5), (10000, -4.5),
               (14000, -0.5)]
    # phase of the cup between the ports: (freq_hz, left_lead_rad)
    lead = [(100, .2), (520, .3), (950, .2), (1470, .45), (1900, .1), (2600, 0), (3200, .1), (3750, .65),
            (4200, .3), (5000, .35), (6300, 0), (8200, -.2), (9650, 2.1), (10700, .9), (11400, 1.7),
            (15000, 2.2)]

    def ports(hz):
        """Half of the difference goes to each port, with opposite signs."""
        ratio = amp(along(balance, hz)) * np.exp(1j * along(lead, hz))
        return ratio ** np.array([[.5], [-.5]])

    cup = filtered(stirring() + knocks() + jolts() + pings(), ports)
    table = cast() * amp([[-.5], [.5]])
    return cup + table + room(amp(-11.0) * cup + amp(-8.0) * table) + background()


def record(dry):
    """Roll off to nothing over 300 Hz around the band limit."""
    return filtered(dry, lambda hz: np.clip((TOP_HZ - hz) / 300 + .5, 0, 1))


dry = scene()
out = record(dry)
dump_mix(out)
```